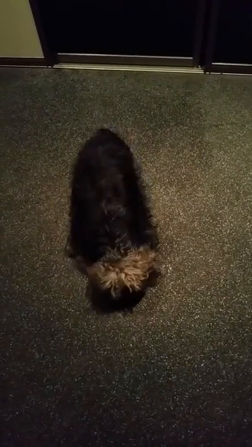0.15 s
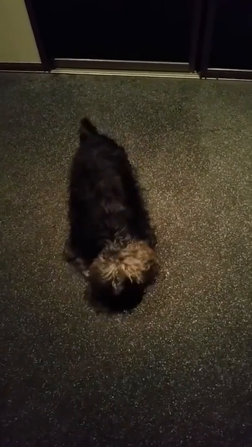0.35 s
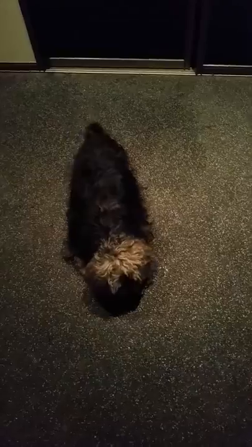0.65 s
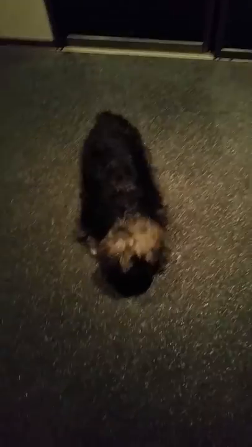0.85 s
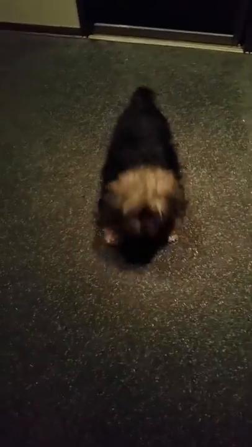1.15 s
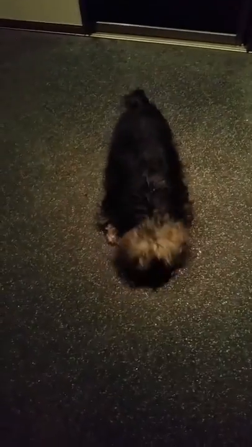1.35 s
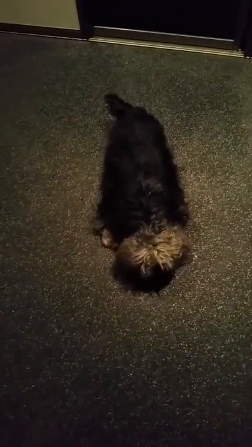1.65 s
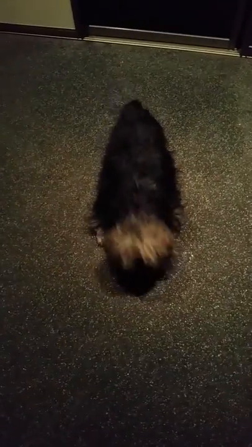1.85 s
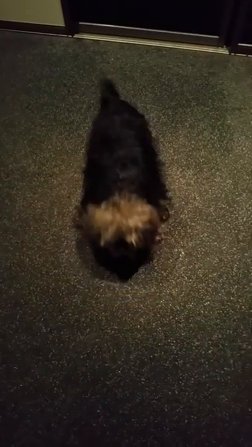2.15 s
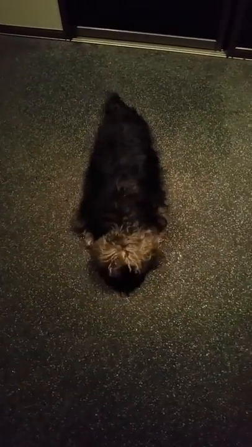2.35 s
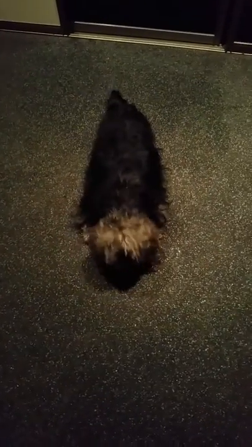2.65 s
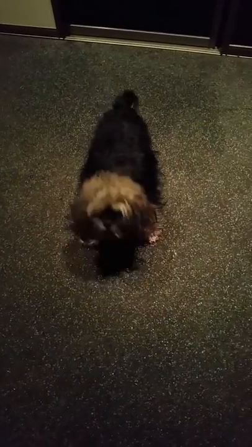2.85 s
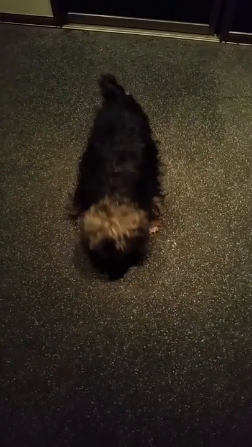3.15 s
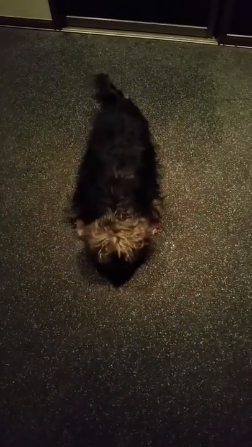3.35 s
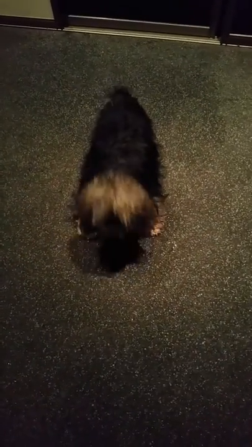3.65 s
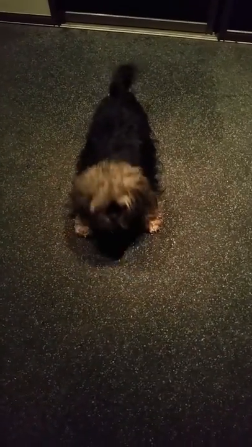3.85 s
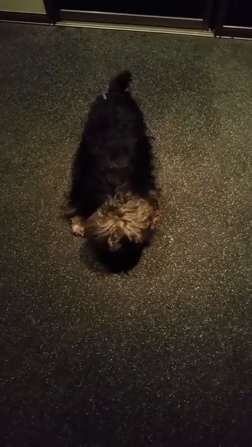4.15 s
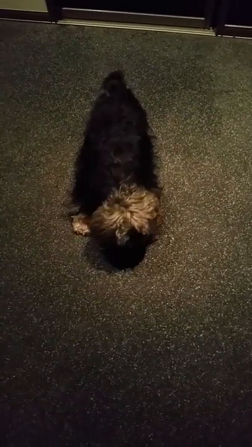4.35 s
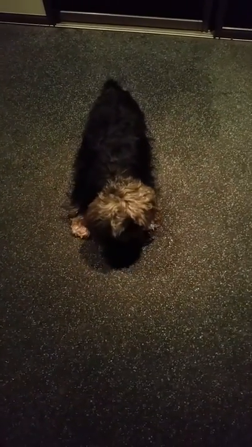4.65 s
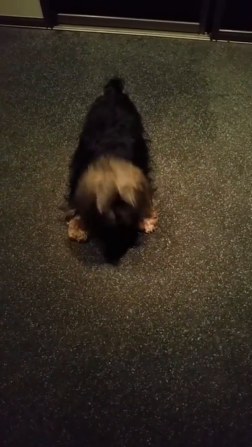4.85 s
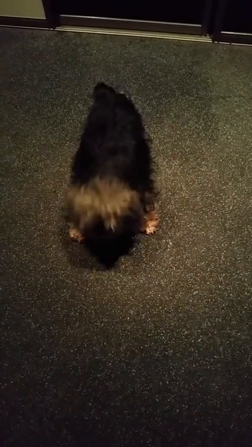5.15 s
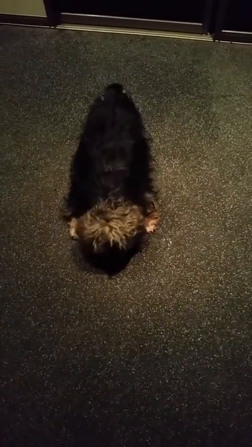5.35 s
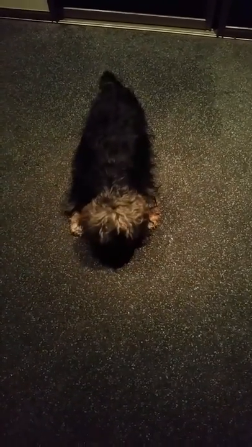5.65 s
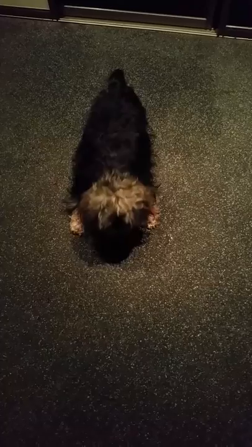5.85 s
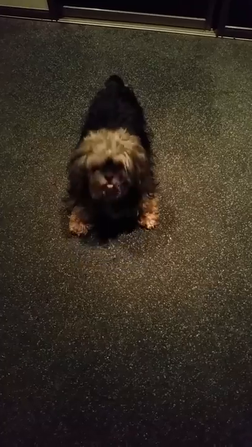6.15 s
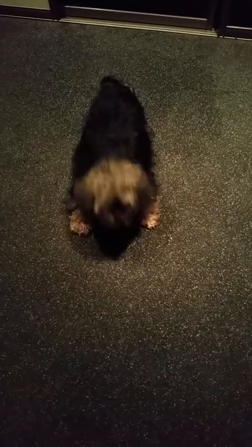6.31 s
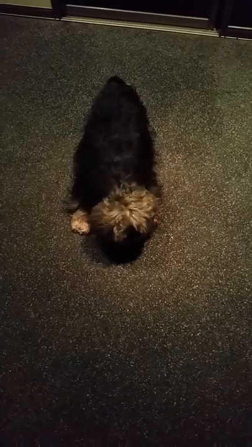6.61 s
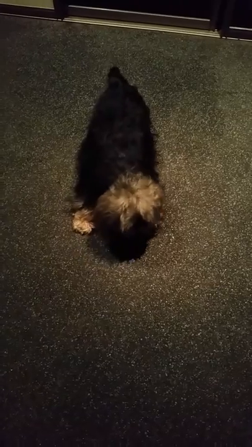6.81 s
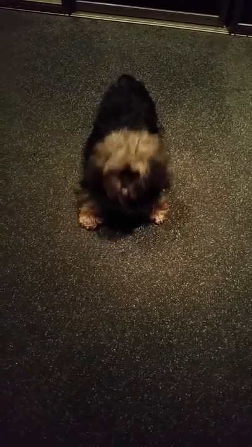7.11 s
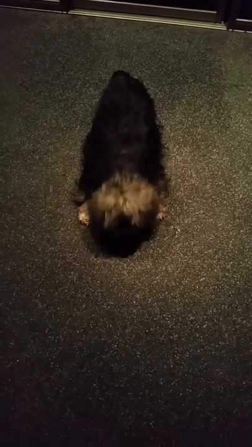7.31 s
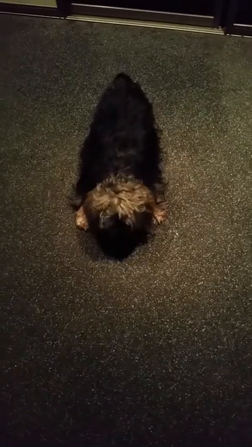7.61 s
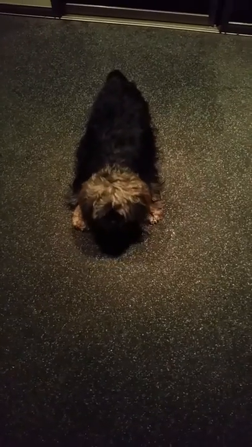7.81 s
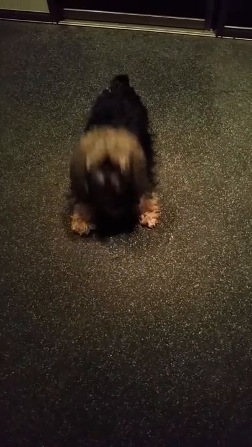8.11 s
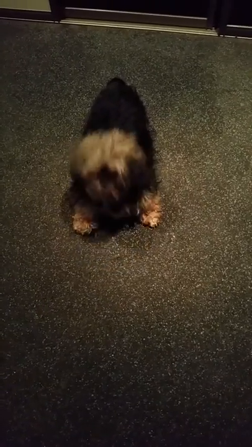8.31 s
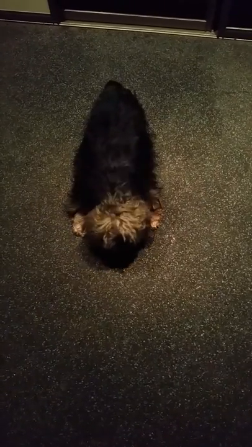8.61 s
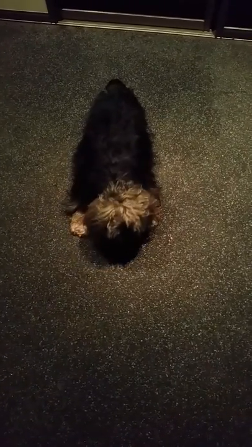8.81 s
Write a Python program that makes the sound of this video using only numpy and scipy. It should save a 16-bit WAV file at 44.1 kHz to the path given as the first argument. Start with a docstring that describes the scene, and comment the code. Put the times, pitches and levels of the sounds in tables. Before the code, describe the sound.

Close to a small dog in a quiet carpeted room. Wet lip clicks and sniffs surround a busy run of thin, falling whimpers in the first two seconds. Short hoarse yips follow about once a second, with nasal hisses trailing them and one soft low grunt. More whimpers gather midway, then calls grow sparse and faint. Soft carpet shuffling, faint hum and room noise remain underneath, with a short indoor echo.

```python
"""Small dog begging indoors

A small dog on a carpet gives short arching yips and thin, gliding whimpers, built from voiced partials.
Shaped noise hisses through its nose, sniffs and clicks on its wet lips; now and then it grunts.
Soft shuffling and one paw fall are low carpet noise; a faint hum and noise floor lie underneath.
Wall echoes, a diffuse tail and a few ringing room notes answer the voice."""
import sys
import numpy as np
from scipy import signal
from scipy.fft import rfft, irfft, next_fast_len
from scipy.io import wavfile
from scipy.ndimage import uniform_filter1d, map_coordinates

SR = 44100
rng = np.random.default_rng(int(sys.argv[2]) if len(sys.argv) > 2 else 0)


def dump(signal):
    """Clip the signal to [-1, 1] and save it as 16-bit WAV at the path in sys.argv[1]."""
    limited = np.clip(np.atleast_2d(signal).T, -1, 1)
    pcm = np.round(limited * 32767).astype(np.int16)
    wavfile.write(sys.argv[1], SR, pcm)


N = 395577

# Levels of the sources are relative: the mix and the ear balance still act on them.
TOP_HZ = 14650  # band limit of the recorder
OVERTONE_FLUTTER = 0.75  # extra unsteadiness of the overtones over the fundamental
SHUFFLE_SWING_DB = 1.8  # depth of the uneven shuffling
BLOW_ATTACK_S, BLOW_SWELL_DB_PER_S, BLOW_RELEASE_DB_PER_S = 0.059, 31.5, 131
LINGER_DB, LINGER_DB_PER_S = -15.5, 35  # trickle of air after each push, and how fast it fades
WHIMPER_JITTER = 0.06  # pitch scatter per octave of glide, as a share of the pitch
WHIMPER_FADE_DB = 4.5  # fall in level with the rebound
# how fast the pitch sags; when (share of the length) and how fast it snaps back
SAG_S, REBOUND_AT, REBOUND_S = 0.0036, 0.84, 0.0024
NOSE_PEAK_HZ, NOSE_WIDTH_HZ, NOSE_PEAK_DB = 1384, 190, 2.5  # resonance of the nasal passage
PAW_S = 0.0372  # half length of a paw fall
# softness of a yip's start; climb of its pitch to the crest, and drop after it
YIP_ATTACK_S, YIP_RISE_S, YIP_FALL_S = 0.011, 0.014, 0.02
# how long before the crest the mouth opens, and how fast; overtones once it is open
OPEN_LEAD_S, OPEN_S, OPEN_OVERTONES_DB = 0.011, 0.004, -3
SHUT_DB = 16  # treble lost while the mouth is shut
YIP_JITTER = 0.2  # pitch scatter per unit of roughness, as a share of the pitch
YIP_PAN_DB = -9  # left minus right
RASP_DB, RASP_LOW_HZ = 6, 822  # rasp gain at full roughness; the mouth radiates little below this pitch
GRUNT_SAG, GRUNT_PAN_DB = 0.131, -4  # share of the pitch lost over a grunt; left minus right
TAIL_DB, TAIL_BUILD_S = -3.5, 0.0098  # diffuse tail under the direct sound; how slowly it fills in


def amp(db):
    """Decibels to gain."""
    return 10 ** (np.asarray(db) / 20)


def unit(x):
    """Scale to rms 1."""
    return x / np.sqrt(np.mean(x ** 2) + 1e-20)


def along(points, hz):
    """Read (Hz, value) points on a log frequency axis."""
    f, v = np.transpose(points)
    return np.interp(np.log(hz + 1), np.log(f + 1), v)


def wobble(rate, size):
    """A smooth random curve with rate knots a second."""
    knots = rng.standard_normal(int(size * rate / SR) + 4)
    return map_coordinates(knots, [np.arange(size) * rate / SR])


def progress(length):
    """0 to 1 over a call of that many seconds."""
    return np.linspace(0, 1, int(length * SR))


def step(t, at, width):
    """A smooth switch from 0 to 1 around time at."""
    return (1 + np.tanh((t - at) / (2 * width))) / 2


def filtered(x, response):
    """Shape x by a response of frequency, padded against wrap-around."""
    m = next_fast_len(N + SR // 4)
    return irfft(rfft(x, m) * response(np.fft.rfftfreq(m, 1 / SR)), m)[..., :N]


def noise(spectrum):
    """Coloured noise of rms 1."""
    return unit(filtered(rng.standard_normal(N), lambda hz: amp(along(spectrum, hz))))


def wide_noise(spectrum):
    """Coloured stereo noise: a shared and an opposed part set how alike the two ears are."""
    # likeness of the ears: (frequency [Hz], left-right correlation [0-1])
    likeness = [(40, 0.15), (200, 0.29), (1000, 0.035)]

    def mid_and_side(hz):
        turn = np.arccos(np.clip(along(likeness, hz), -1, 1)) / 2
        return amp(along(spectrum, hz)) * [np.cos(turn), np.sin(turn)]

    mid, side = filtered(rng.standard_normal((2, N)), mid_and_side)
    return unit(np.array([mid + side, mid - side]))


def add(track, s, sound, pan_db=0):
    """Mix a sound into a stereo track at time s."""
    part = track[:, max(round(s * SR), 0):][:, :len(sound)]
    part += amp([[pan_db / 2], [-pan_db / 2]]) * sound[:part.shape[1]]


def call(pitch, level_db, tract, rough, jitter, edge):
    """One squeeze of the vocal folds: gliding partials, each weighted by tract(order, Hz) in dB."""
    size = len(pitch)
    u = np.linspace(0, 1, size)
    pitch = pitch * (1 + jitter * u * wobble(500, size))
    k = np.arange(1, 9)[:, None]
    phase = 2 * np.pi * np.cumsum(pitch) / SR
    # the folds close less and less evenly, which smears the overtones most
    unevenness = (rough + OVERTONE_FLUTTER * (k > 1)) * u
    flutter = 1 + unevenness * np.array([wobble(400, size) for _ in k])
    voice = unit(np.sum(amp(tract(k, k * pitch)) * flutter * np.sin(k * phase), axis=0))
    from_ends_s = np.minimum(u, 1 - u) * size / SR
    gate = np.sin(np.pi / 2 * np.clip(from_ends_s / edge, 0, 1)) ** 2
    return gate * amp(level_db) * voice


def background(air):
    """Steady hum tones and a coloured noise floor, with carpet rustle that follows the dog's breath."""
    # hum tones: (frequency [Hz], level [dB])
    hum_tones = [(46, -70), (207, -77.5)]
    # body and paws shuffling on the carpet: (frequency [Hz], level [dB])
    carpet_spectrum = [(30, -21.5), (80, -0.5), (220, 1.5), (500, -4.5), (1000, -7.5), (2500, -48)]
    # room rumble and microphone hiss: (frequency [Hz], level [dB])
    floor_spectrum = [(28, -22.5), (45, 6), (70, 3.5), (200, -11.5), (500, -8), (1100, -24.5),
                      (1900, -20.5), (2450, -34), (3050, -20.5), (3700, -19), (4020, -13), (4600, -26),
                      (7500, -53.5), (10500, -35.5), (14500, -33)]
    # stereo balance of the background: (frequency [Hz], left minus right [dB])
    balance = [(50, -3.5), (250, -0.5), (2400, 7.5), (4000, 13), (7000, 1)]
    t = np.arange(N) / SR
    hum = sum(amp(db) * unit(np.sin(2 * np.pi * hz * t + 0.5 * wobble(1.2, N))) for hz, db in hum_tones)
    # the harder the dog begs, the more it shifts on the carpet
    effort = np.abs(uniform_filter1d(air / air.max(), int(0.25 * SR))) + 0.0013
    swing = amp(-57.5 + SHUFFLE_SWING_DB * wobble(14, N))
    shuffle = effort ** 0.29 * swing * wide_noise(carpet_spectrum)
    floor = amp(-67.5) * wide_noise(floor_spectrum)
    return filtered(hum + shuffle + floor, lambda hz: amp(along(balance, hz) * [[0.5], [-0.5]]))


def sniffs():
    """Gasps through the nostrils and fast-dying clicks of the wet lips gate one coloured noise."""
    # sniffs: (time of the peak [s], rise [s], fall [s], level [dB])
    gasps = [(1.094, 0.047, 0.048, -30), (1.754, 0.037, 0.083, -40.5), (2.349, 0.029, 0.09, -44.5),
             (7.099, 0.055, 0.048, -61), (8.26, 0.16, 0.1, -61.5)]
    # wet lip smacks: (time [s], peak level [dB])
    smacks = [(0.059, -32), (0.1461, -53), (0.967, -35), (0.987, -34), (1.349, -46.5), (1.718, -32),
              (3.173, -55.5), (6.975, -57)]
    # colour of both: (frequency [Hz], level [dB])
    breath_spectrum = [(300, -12.5), (1800, -14.5), (3200, -21), (4700, -8.5), (7000, -14), (8500, -12),
                       (10200, 7), (11700, 7), (13000, 2), (14500, -6.5)]
    t = np.arange(N) / SR
    flow = np.zeros(N)
    for s, rise, fall, db in gasps:
        flow += amp(db - 20 * np.abs((t - s) / np.where(t < s, rise, fall)) ** 1.7)
    lips = sum(amp(db) * (t >= s) * np.exp(-np.abs(t - s) / 0.0011) for s, db in smacks)
    return (flow * amp(2.2 * wobble(90, N)) + lips) * noise(breath_spectrum)


def airflow():
    """Strength of the air in the nose: each push opens quickly, swells, lets go and trickles on."""
    # long pushes of air: (time [s], length [s], strength at the end of the push [dB])
    pushes = [(0.06, 0.011, -55.5), (0.513, 0.19, -56), (0.687, 0.23, -47), (1.443, 0.44, -60),
              (2.352, 0.22, -60.5), (3.272, 0.19, -55.5), (4.097, 0.19, -68), (4.234, 0.23, -57),
              (5.318, 0.27, -67), (5.524, 0.29, -61.5), (6.518, .16, -63.5), (6.743, 0.2, -64.5),
              (6.988, 0.091, -61.5), (8.803, 0.21, -68.5)]
    t = np.arange(N) / SR
    power = np.zeros(N)
    for s, length, db in pushes:
        opening = np.clip((t - s) / BLOW_ATTACK_S, 0, 1)
        left = np.clip(s + length - t, 0, length)
        past = np.maximum(t - s - length, 0)
        push = amp(-BLOW_SWELL_DB_PER_S * left - BLOW_RELEASE_DB_PER_S * past)
        trickle = amp(LINGER_DB - LINGER_DB_PER_S * past)
        power += (amp(db) * opening * (push + trickle)) ** 2
    return np.sqrt(power)


def nose(air):
    """Narrow nostrils hiss unsteadily; a thin noise whistle grows with the square of the flow."""
    # colour of the hiss: (frequency [Hz], level [dB])
    hiss_spectrum = [(300, -4), (1900, -2.5), (3100, -5.5), (4200, 1), (5600, -6.5), (6600, -32.5),
                     (7900, -39.5), (8400, -13.5), (9000, -12.5), (9700, 4.5), (10800, 10), (12400, -1.5),
                     (14300, -6)]
    flow = air * amp(1.3 * wobble(45, N) + 0.9 * wobble(12, N))
    effort = air / air.max()
    band = filtered(rng.standard_normal((2, N)), lambda hz: np.exp(-((hz - 7300) / 220) ** 2))
    whistle = amp(-13) * effort * unit(band)
    return flow * (amp(1.5) * wide_noise(hiss_spectrum) + whistle)


def whimpers():
    """Thin notes through the nose: each holds, glides (mostly down) and partly snaps back; wide glides are rougher."""
    # whimpers: (time [s], length [s], starting pitch [Hz], sagged pitch [Hz],
    #   hold before the sag [share of length], rebound [share of the sag], level [dB],
    #   swell with the sag [dB], overtones [dB], left minus right [dB])
    cries = [ (0.395, 0.049, 1080, 1170, 0.34, 1.1, -61.5, 0.5, 2, -9),
             (0.5, 0.046, 1257, 1160, 0.36, 1.5, -59, 3, 3, -9),
             (0.576, 0.062, 1382, 1316, 0.44, 2.3, -40.5, 8, -5, -5.5),
             (0.701, 0.076, 1405, 1055, 0.39, 1.1, -36.5, 0.5, -0.5, -12.5),
             (0.833, 0.066, 1482, 1126, 0.26, 0.7, -33.5, 2.5, 6.5, -11),
             (1.612, 0.044, 1176, 1029, 0.22, 2.06, -41.5, 9.5, 1, -8),
             (1.73, 0.05, 1433, 1121, 0.21, 1.17, -33.5, 18.5, 11, -8),
             (4.248, 0.046, 1440, 1332, 0.17, 1, -43, 3.5, -1, -8.5),
             (4.381, 0.045, 1402, 1383, 0.15, 0.1, -33, 5, -11.5, -8.5),
             (4.596, 0.03, 1348, 1281, 0.51, 0.39, -40.5, 6, -15, -2),
             (5.526, 0.042, 1260, 1224, 0.48, 1.7, -46.5, 11.5, -20, -16),
             (5.651, 0.071, 1294, 1174, 0.36, 0.032, -42.5, 11, -16, -10.5),
             (5.752, 0.059, 1248, 924, 0.27, 0.5, -43.5, -2, -6.5, -8.5),
             (5.935, 0.02, 1028, 1002, 0.36, 0.18, -45.5, 4, 2, -6),
             (6.854, 0.05, 1185, 1132, 0.79, 0.092, -44, 17.5, -18, -7)]
    # what the nose lets through of the overtones: (frequency [Hz], level [dB])
    nasal_response = [(1860, -6.5), (2050, -34), (2450, -27), (2800, -30), (3250, -45), (4050, -26.5),
                      (5200, -60.5)]
    out = np.zeros((2, N))
    for s, length, start_hz, low_hz, hold, rebound, db, swell_db, overtones_db, pan_db in cries:
        t = progress(length) * length
        sag = step(t, hold * length, SAG_S)
        back = step(t, REBOUND_AT * length, REBOUND_S)
        pitch = start_hz + (low_hz - start_hz) * (sag - rebound * back)
        resonance_db = NOSE_PEAK_DB * np.exp(-((pitch - NOSE_PEAK_HZ) / NOSE_WIDTH_HZ) ** 2)
        level_db = db + resonance_db - swell_db * (1 - sag) - WHIMPER_FADE_DB * back
        strain = abs(np.log2(start_hz / low_hz))  # octaves of glide
        tract = lambda k, hz: (k > 1) * (overtones_db + along(nasal_response, hz))
        cry = call(pitch, level_db, tract, rough=0.28 * strain, jitter=WHIMPER_JITTER * strain, edge=0.0045)
        add(out, s, cry, pan_db)
    return out


def paws():
    """A dull thud as the dog shifts its weight on the carpet: a short swell of low noise."""
    # paw falls: (time of the peak [s], level [dB])
    falls = [(0.976, -49.5)]
    # colour of the thud: (frequency [Hz], level [dB])
    thud_spectrum = [(30, -5), (140, -12.5), (400, -24), (1500, -79.5)]
    t = np.arange(N) / SR
    return sum(amp(db) * np.exp(-((t - s) / PAW_S) ** 2) for s, db in falls) * wide_noise(thud_spectrum)


def muzzle(overtones_db, treble_db, gape):
    """The tract of the mouth; the wider it gapes, the higher its resonances lie."""
    # what the open muzzle lets through: (frequency [Hz], level [dB])
    mouth_response = [(300, 14), (900, 10.5), (1450, 2.5), (2000, 3), (2500, 0.5), (3050, -19.5), (4100, 0),
                      (4900, -40.5)]

    def tract(k, hz):
        treble = treble_db * np.clip((hz - 1600) / 430, 0, 1)
        return along(mouth_response, hz / gape) + (k > 1) * overtones_db + treble

    return tract


def yips():
    """A held nasal note arches up as the mouth opens and turns hoarse; puffs in each cycle add a rasp."""
    # yips: (time [s], length [s], held pitch [Hz], top pitch [Hz], crest [share of length],
    #   level [dB], swell as the mouth opens [dB], overtones while shut [dB], treble [dB],
    #   gape [factor on the resonances], roughness [0-1])
    barks = [ (1.449, 0.067, 612, 792, 0.86, -51, -1, -11, -4, 0.8, 0.6),
             (2.343, 0.054, 605, 971, 0.76, -45, 11, 4.5, -7, 0.77, 0.61),
             (3.238, 0.058, 630.7, 946, 0.71, -30.5, 19.5, 12, 1.5, 0.99, 0.4),
             (4.089, 0.061, 680, 1022, 0.72, -37, 11, 15.5, -1.5, 0.85, 0.5),
             (5.31, .055, 546, 725, 0.88, -50, 0.5, 1, -11.5, 0.7, 0.5),
             (6.518, 0.055, 368.7, 538, 0.84, -42, 10, -5, -19, 0.66, 0.31),
             (8.816, 0.052, 502, 569, 0.87, -48.5, -1, 1, -18, 0.64, 0.51)]
    out = np.zeros((2, N))
    for s, length, held_hz, top_hz, crest, db, swell_db, nasal_db, treble_db, gape, rough in barks:
        t = progress(length) * length
        late = t - crest * length
        arch = np.exp(-np.abs(late / np.where(late < 0, YIP_RISE_S, YIP_FALL_S)) ** 1.5)
        pitch = held_hz + (top_hz - held_hz) * arch
        opening = step(late, -OPEN_LEAD_S, OPEN_S)
        shut = 1 - opening
        overtones_db = nasal_db * shut + OPEN_OVERTONES_DB * opening
        tract = muzzle(overtones_db, treble_db - SHUT_DB * shut, gape)
        yip = call(pitch, db - swell_db * shut, tract, rough, jitter=YIP_JITTER * rough * opening, edge=0.0054)
        yip = yip * (1 - np.exp(-t / YIP_ATTACK_S))
        # turbulent air escapes on the positive half of each cycle
        puffs = opening * np.maximum(yip, 0) * rng.standard_normal(len(t))
        hz = np.fft.rfftfreq(2 * len(t), 1 / SR)
        mouth = amp(muzzle(0, treble_db, gape)(1, hz)) * (1 - np.exp(-(hz / RASP_LOW_HZ) ** 4))
        rasp = irfft(rfft(puffs, 2 * len(t)) * unit(mouth))[:len(t)]
        add(out, s, yip + amp(RASP_DB) * rough * rasp, YIP_PAN_DB)
    return out


def grunts():
    """Short low notes that sag a little behind closed lips."""
    # grunts: (time [s], length [s], pitch [Hz], level [dB], overtones [dB], roughness [0-1])
    notes = [(2.626, 0.058, 167.8, -48, -11.5, 0.53), (6.389, 0.023, 207, -54.5, -28, 0.1)]
    out = np.zeros((2, N))
    for s, length, hz, db, overtones_db, rough in notes:
        pitch = hz * (1 - GRUNT_SAG * progress(length))
        tract = muzzle(overtones_db, treble_db=0, gape=0.41)
        grunt = call(pitch, db, tract, rough, jitter=0.095 * rough, edge=0.0025)
        add(out, s, grunt, GRUNT_PAN_DB)
    return out


def room(x):
    """Two dull wall echoes, and a diffuse noise tail whose decay time depends on frequency."""
    # wall echoes: (delay [s], left level [dB], right level [dB])
    echoes = [(.0062, -28.5, -14), (0.055, -9, -20)]
    # decay by 60 dB: (frequency [Hz], time [s])
    decay = [(180, 0.2), (550, 0.46), (1100, 0.33), (4000, 0.53), (12000, 0.2)]
    dull = filtered(x, lambda hz: 1 / (1 + (hz / 5000) ** 2))
    early = np.zeros((2, N))
    for delay, left_db, right_db in echoes:
        late = np.pad(dull, ((0, 0), (round(delay * SR), 0)))[:, :N]
        early += amp([[left_db], [right_db]]) * late
    hz, t, z = signal.stft(rng.standard_normal((2, SR // 2)), SR, nperseg=256)
    envelope = amp(-60 * t / along(decay, hz)[:, None]) * (1 - np.exp(-t / TAIL_BUILD_S))
    tail = signal.istft(z * envelope, SR, nperseg=256)[1]
    tail /= np.linalg.norm(tail, axis=1, keepdims=True)
    return early + amp(TAIL_DB) * signal.fftconvolve(x, tail, axes=1)[:, :N]


def standing_waves(x):
    """Narrow room resonances: a few notes hang on when the voice passes through them."""
    # standing waves: (frequency [Hz], width [Hz], level [dB])
    modes = [(500, 8.6, -11), (567, 5.1, 12), (1117.4, 15, -5)]

    def ringing(f):
        return sum(amp(db) * 1j * f * width / (hz ** 2 - f ** 2 + 1j * f * width) for hz, width, db in modes)

    return filtered(x, ringing)


def scene():
    """The dog in its room; its direct sound reaches the right a hair before the left, each with its own colour."""
    # the dog as the two microphones hear it: (frequency [Hz], left minus right [dB])
    ear_balance = [(1400, 1), (2300, -0.5), (4000, 9.5), (5800, -12), (8000, -1), (10000, -.5)]
    calls = amp(-3.5) * (whimpers() + yips() + grunts())
    gasps = amp(-2.0) * sniffs()
    air = airflow()
    lag_s = 2e-5
    sides = np.array([[-1], [1]])
    near = filtered(calls + gasps + nose(air), lambda hz: np.exp(1j * np.pi * hz * lag_s * sides))
    # sniffs feed the echoes and tail 1 dB up; only the voice rings the standing waves
    answer = room(calls + amp(1.0) * gasps) + standing_waves(calls)
    dog = filtered(near + answer, lambda hz: amp(along(ear_balance, hz) * [[0.5], [-0.5]]))
    return dog + paws() + background(air)


def record(dry):
    """The recorder keeps nothing above its band limit."""
    return filtered(dry, lambda hz: hz < TOP_HZ)


dry = scene()
out = record(dry)
dump(out)
```